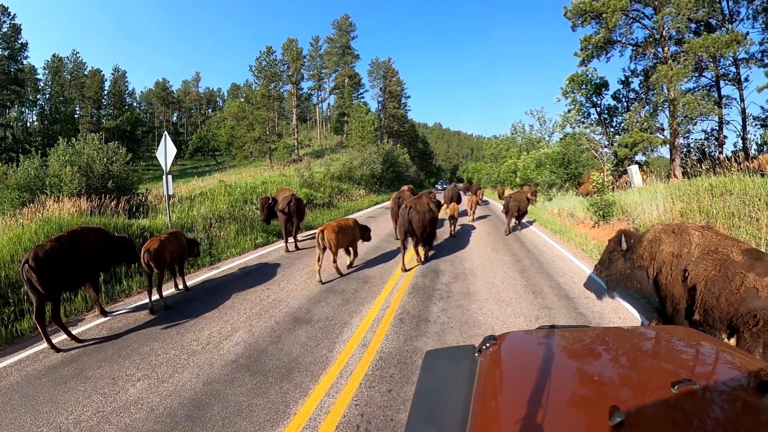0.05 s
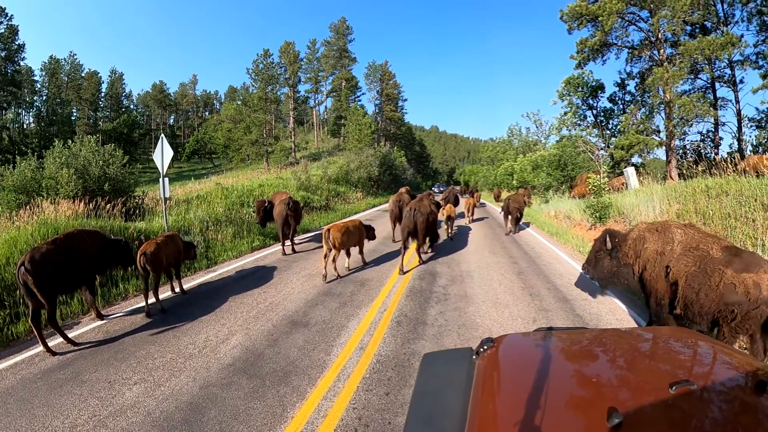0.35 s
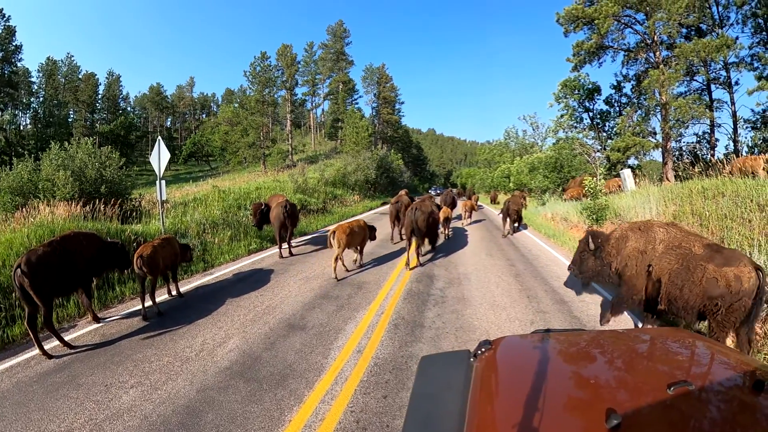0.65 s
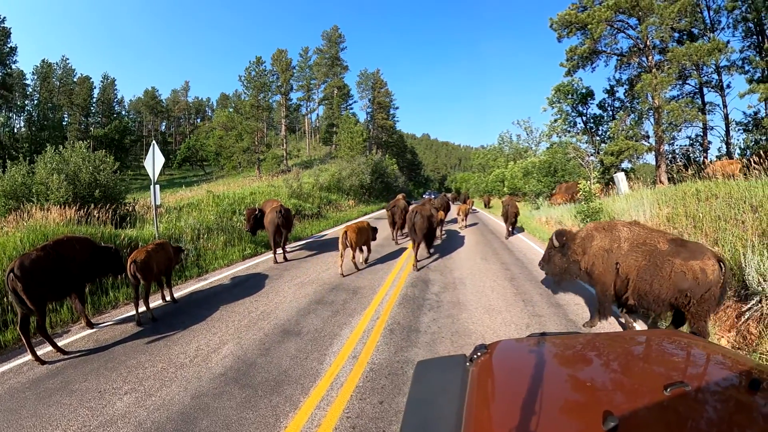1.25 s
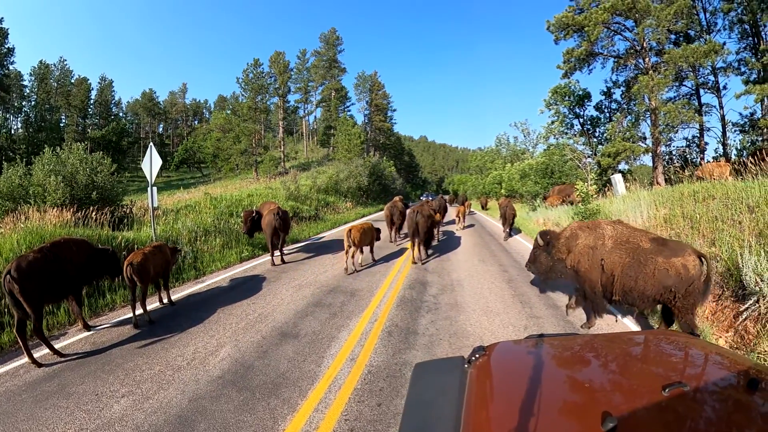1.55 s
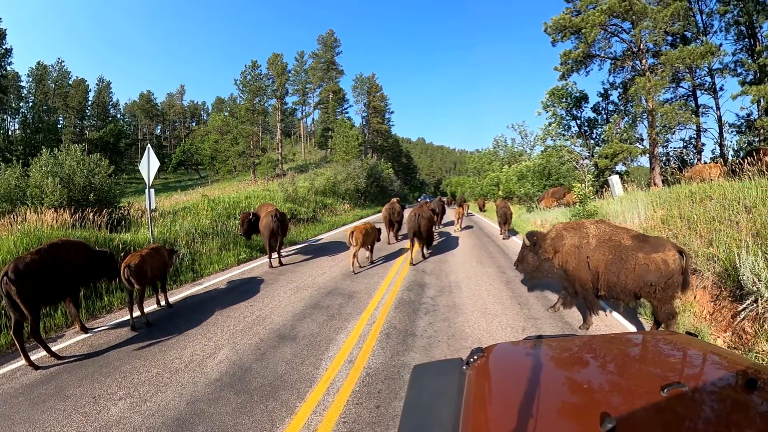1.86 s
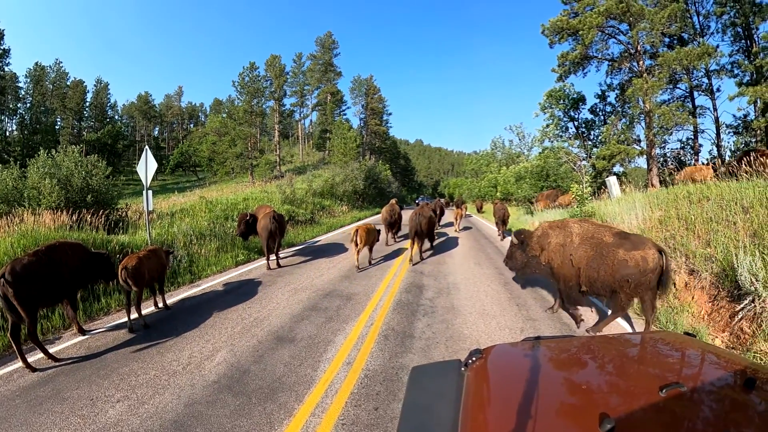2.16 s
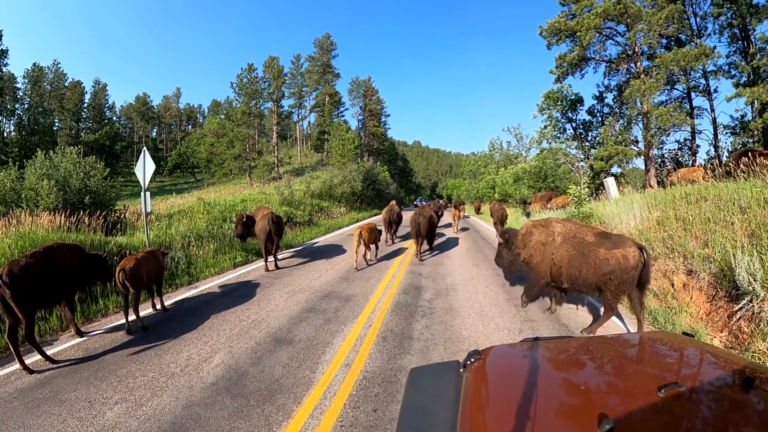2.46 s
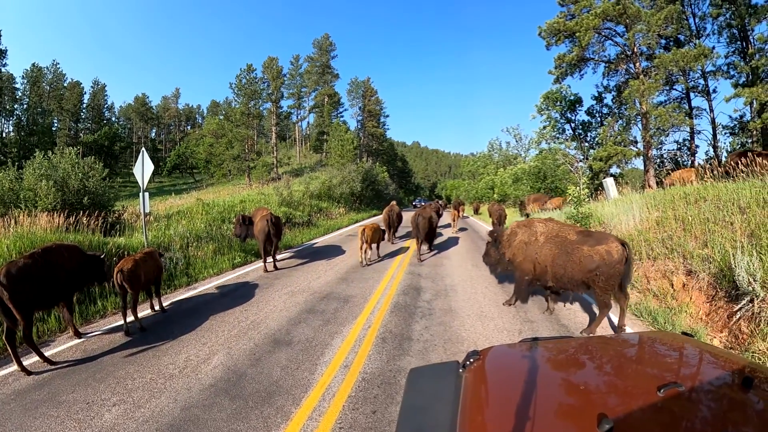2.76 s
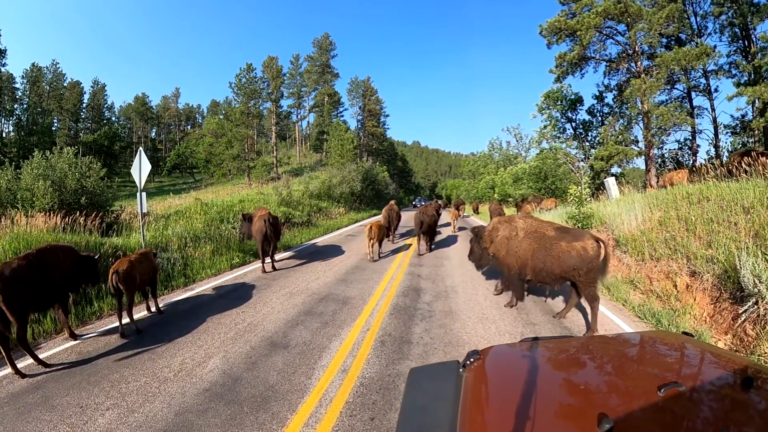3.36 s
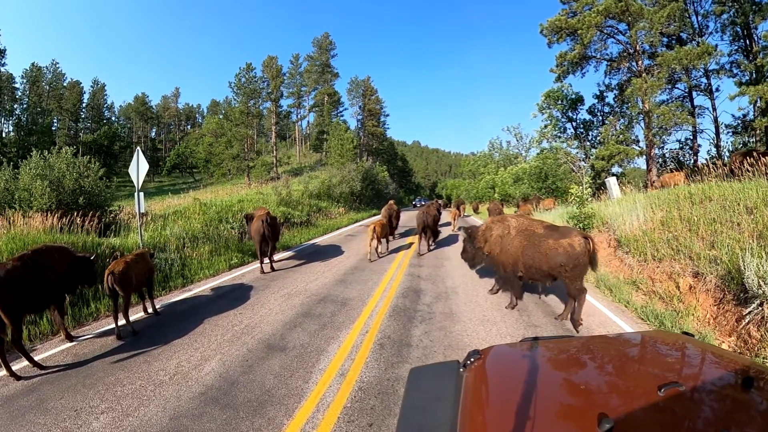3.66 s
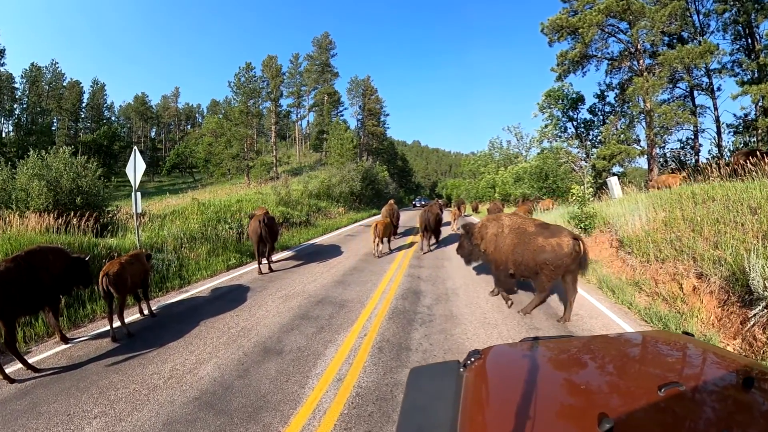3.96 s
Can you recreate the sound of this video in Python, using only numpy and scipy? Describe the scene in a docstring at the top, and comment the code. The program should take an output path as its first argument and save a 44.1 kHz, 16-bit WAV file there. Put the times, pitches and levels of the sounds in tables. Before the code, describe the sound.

Two low, rough bison grunts, short then longer, over a steady engine rumble.

```python
"""Bison on a hill road

Beside the microphone, on a road in open hills, a bison gives a short grunt and then a long one:
slow glottal pulses ring its throat and chest, and in the long grunt its mouth and nose too.
Others answer from up the road. One vehicle idles while a second engine creeps along with the herd.
A hoof scuffs the asphalt, a small bird whistles far off and a light wind bumps the microphone."""
import sys
import numpy as np
from scipy import signal
from scipy.fft import rfft, irfft, next_fast_len
from scipy.io import wavfile
from scipy.ndimage import map_coordinates

SR = 44100
rng = np.random.default_rng(int(sys.argv[2]) if len(sys.argv) > 2 else 0)


def int16_out(signal):
    """Quantize to a 16-bit WAV file."""
    q = np.round(np.clip(np.atleast_2d(signal).T, -1, 1) * 32767)
    wavfile.write(sys.argv[1], SR, q.astype(np.int16))


N = 176400  # 4 seconds

# The course of each close grunt.
# Each row: time in seconds, glottal pulses per second, relative effort in dB, chest gain in dB.
SHORT_GRUNT = [(.0122, 26.6, 0, -7.5), (.125, 27, -2, -2.5), (.165, 23, -14.5, -5), (.19, 25, -20, -12)]
LONG_GRUNT = [(2.0645, 27.6, -14.5, -19), (2.137, 29.06, -2, -14), (2.171, 29.31, -1, -4.5),
              (2.21, 29.86, -14, -2.5), (2.268, 35.84, -13, -0.5), (2.295, 36.92, -1.5, 0.5),
              (2.453, 38.57, 0.5, -0.5), (2.485, 35.62, -4.5, -3.5), (2.541, 33.25, -4.5, -5),
              (2.572, 28.53, -1.5, -7.5), (2.609, 25.64, -18, -15), (2.66, 25.55, -22, -22)]
# Airway resonances. Each row: nominal pitch in Hz, relative level in dB, seconds to fall 60 dB.
SHORT_THROAT_MODES = [(158, -25, .06), (1290, -32, .015), (1473, -27, 0.029), (1831, -24, 0.048),
                      (2173, -38, 0.05), (2660, -47, 0.037), (5560, -51, 0.033), (6240, -44, 0.022)]
LONG_THROAT_MODES = [(1790, -30.5, 0.042), (2773, -44.5, 0.048), (3238, -38, 0.033), (5640, -46, 0.035),
                     (7740, -55.5, 0.042)]
MOUTH_MODES = [(756, -31, 0.044), (1013, -36.5, 0.032), (1244, -40, 0.057), (1547, -35.5, 0.071),
               (1763, -33.5, 0.083)]
NOSE_MODES = [(2132, -32.5, 0.043)]
# How strongly mouth and nose ring in the long grunt. Each row: time in seconds, gain in dB.
MOUTH_GAIN = [(2.268, -16), (2.294, 0), (2.46, -1), (2.49, -10), (2.65, -19)]
NOSE_GAIN = [(2.07, -12), (2.14, 0), (2.22, -15), (2.35, -5), (2.54, -16), (2.57, 5), (2.65, -12)]


def near_bison():
    """Two grunts close by; the long one swells in the chest, opens the mouth and ends in the nose."""
    short = grunt(SHORT_GRUNT, SHORT_THROAT_MODES, gain_db=3)
    cavities = [(MOUTH_MODES, MOUTH_GAIN), (NOSE_MODES, NOSE_GAIN)]
    long = grunt(LONG_GRUNT, LONG_THROAT_MODES, gain_db=4, cavities=cavities)
    return echoed(short + long, db=-11.5, t60=0.19)


# Chest resonances. Each row: nominal pitch in Hz, relative level in dB, seconds to fall 60 dB.
CHEST_MODES = [(126, -28, 0.1), (185.3, -26, 0.067), (231, -27.5, 0.055), (349, -28, 0.057)]
# Rasping breath at close range. Each row: frequency in Hz, relative level in dB.
RASP_SPECTRUM = [(300, 0), (1800, 4.5), (4600, -10.5), (7500, -13), (14000, -39.5)]


def grunt(gesture, throat, gain_db, cavities=()):
    """Slow glottal pulses ring throat, chest and any open cavities, each with a puff of rasping air."""
    pulse_hz, effort_db, chest_db = curves(gesture)
    parts = [(throat, effort_db), (CHEST_MODES, chest_db)]
    parts += [(modes, curves(gain)[0]) for modes, gain in cavities]
    first, last = max(round(gesture[0][0] * SR), 0), round(gesture[-1][0] * SR)
    cycles = np.cumsum(pulse_hz[first:last]) / SR
    pulse_samples = first + np.searchsorted(cycles, np.arange(int(cycles[-1]) + 1))
    t = np.arange(SR // 8) / SR
    puff = decay(t, t60=0.066) * rise(t, seconds=0.0043)
    voice, puffs = np.zeros(N), np.zeros(N)
    for i in pulse_samples:
        tuning = 1 - 0.0022 * chest_db[i]  # resonances sharpen a little as the chest tone falls away
        add(voice, i / SR, sum(amp(db[i]) * airway_ring(modes, t, tuning) for modes, db in parts))
        add(puffs, i / SR, amp(effort_db[i]) * puff)
    rasp = amp(-39) * puffs * noise(RASP_SPECTRUM)
    return amp(gain_db) * (voice + rasp)


# How late a resonance speaks. Each row: frequency in Hz, delay in seconds.
MODE_DELAY = [(1200, 0), (1800, 0.003), (3200, 0.00078)]
# How gently it starts. Each row: frequency in Hz, rise time constant in seconds.
MODE_RISE = [(1200, 0.00076), (1750, 0.0023), (3200, 0.0015)]


def airway_ring(modes, t, tuning):
    """Soft, wet resonances answer one glottal pulse; the upper ones speak later."""
    hz, db, t60 = np.transpose(modes)[:, :, None]
    level_scatter, pitch_scatter = rng.standard_normal((2, len(modes), 1))
    pitch_hz = hz * (tuning + 0.0074 * pitch_scatter)
    age = np.maximum(t - along(MODE_DELAY, hz), 0)
    # The lower resonances start flat and rise as the glottis shuts.
    flat_share, bend_s = 0.19 * (hz < 2200), 0.0023
    bent_age = age - flat_share * bend_s * rise(age, bend_s)
    phase_flutter = 0.07 * np.cumsum(rng.standard_normal(age.shape) * np.sqrt(hz / SR), 1)
    envelope = amp(db + 2 * level_scatter) * decay(age, t60) * rise(age, along(MODE_RISE, hz)) ** 2
    return np.sum(envelope * np.sin(2 * np.pi * pitch_hz * bent_age + phase_flutter), 0)


# Grunts up the road. Each row: start in seconds, length in seconds, level in dB.
FAR_GRUNTS = [(3.27, 0.27, -44), (3.742, 0.33, -31.5)]
# Their tone at that distance. Each row: frequency in Hz, relative level in dB.
FAR_CHEST_SPECTRUM = [(60, -33), (110, 2), (150, 4.5), (190, 2), (260, -23), (1000, -70)]


def far_bison():
    """From farther up the road, only the pulsing chest tone carries to the microphone."""
    pulse_hz = 36.4 * (1 + 0.0249 * wobble(20))
    cycles = np.cumsum(pulse_hz) / SR
    pulses = np.diff(np.floor(cycles), prepend=0)
    return unit_rms(filtered(pulses, FAR_CHEST_SPECTRUM)) * swells(FAR_GRUNTS)


# The hum of the standing vehicle. Each row: multiple of the firing rate, level in dB.
IDLE_HARMONICS = [(1, -27.5), (2, -35)]


def idling_engine(firing_hz=36.76, whine_hz=353.2):
    """The standing vehicle hums with its firing harmonics and a thin accessory whine."""
    hum = sum(amp(db) * unsteady_tone(multiple * firing_hz, waver_db=0.7, drift_radians=0.089)
              for multiple, db in IDLE_HARMONICS)
    return hum + amp(-51.5) * unsteady_tone(whine_hz, waver_db=2, drift_radians=0.21)


# The engine following the herd. Each row: time in seconds, cycles per second, gain in dB.
CREEP_SPEED = [(0, 9.84, 0.5), (.85, 10.17, -3), (1.2, 12.1, -2), (1.55, 12.93, -1.5), (2, 12.2, -0.5),
               (2.5, 11.25, 0.5), (3, 9.54, -0.5), (3.4, 8.9, -1.5), (4, 8.94, 1.5)]
# Its exhaust tones. Each row: multiple of the cycle rate, relative level in dB.
EXHAUST_ORDERS = [(4, -36), (5, -26.5), (6, -37), (7, -36.5), (9, -37), (10, -36), (11, -36), (12, -39.5)]
# What its muffler lets out. Each row: frequency in Hz, gain in dB.
MUFFLER_RESPONSE = [(47, -3), (59, 2), (85, -1.5), (138, 0), (155, -7.5)]


def creeping_engine(scatter_radians=0.45):
    """The exhaust throbs once a cycle, all orders locked to the crank, as it speeds up and settles."""
    cycle_hz, gain_db = curves(CREEP_SPEED)
    cycle_phase = 2 * np.pi * np.cumsum(cycle_hz) / SR
    exhaust = np.zeros(N)
    for order, db in EXHAUST_ORDERS:
        level_db = db + gain_db + along(MUFFLER_RESPONSE, order * cycle_hz) + wobble(10)
        exhaust += amp(level_db) * np.sin(order * cycle_phase + scatter_radians * rng.standard_normal())
    return np.sqrt(2) * exhaust


# Far whistles. Each row: start and length in seconds, first, middle and last pitch in Hz, level in dB.
BIRD_NOTES = [(2.684, .06, 2850, 2560, 2280, -52), (2.76, 0.085, 2950, 2880, 2240, -50),
              (3.256, .1, 2425, 2676, 2730, -45), (3.394, 0.072, 3080, 2770, 2500, -50),
              (3.898, 0.098, 2860, 2490, 2260, -43)]
# More birds, blurred by distance. Each row: frequency in Hz, relative level in dB.
TWITTER_SPECTRUM = [(1700, -70.5), (2550, 2), (2900, -2), (4000, -71)]


def far_birds():
    """Slurred, slightly husky whistles echo among the pines, with a faint twitter near the end."""
    song = np.zeros(N)
    for start, length, first_hz, middle_hz, last_hz, db in BIRD_NOTES:
        progress = np.linspace(0, 1, round(length * SR))
        slur = np.polyfit([0, 0.5, 1], [first_hz, middle_hz, last_hz], 2)
        warble = 1 + 0.018 * wobble(300)[:len(progress)]
        hz = np.polyval(slur, progress) * warble
        add(song, start, amp(db) * np.sin(np.pi * progress) * np.sin(2 * np.pi * np.cumsum(hz) / SR))
    whistles = echoed(song, db=-2.5, t60=0.35)
    twitter = amp(-56) * swell(start=3.44, length=1) * noise(TWITTER_SPECTRUM)
    return whistles + twitter


# A hoof on the road. Each row: start in seconds, length in seconds, level in dB.
SCUFFS = [(1.383, 0.056, -55)]
# The grit under it. Each row: frequency in Hz, relative level in dB.
GRIT_SPECTRUM = [(500, -13), (2000, -10), (7000, -4), (14000, -36)]


def hoof_scuff():
    """A hoof drags over the asphalt in one faint, grainy hiss."""
    grit = unit_rms(noise(GRIT_SPECTRUM) * amp(4 * wobble(370)))
    return grit * swells(SCUFFS)


# The steady rumble and rush at the roadside. Each row: frequency in Hz, relative level in dB.
RUMBLE_SPECTRUM = [(8, -19), (25, 1), (50, 7.5), (130, 0.5), (190, -12.5), (4000, -120)]
RUSH_SPECTRUM = [(100, -3.5), (320, 2), (490, -4), (700, -6.5), (860, -14), (1030, -11.5), (1400, -17),
                 (3200, -24), (4600, -31), (5300, -27), (7700, -35), (9900, -45), (12000, -58)]


def roadside_air():
    """A low rumble and the rush of fans, tyres and trees lie all around the microphone."""
    rumble = amp(-29 + 1.7 * wobble(4.2)) * noise(RUMBLE_SPECTRUM)
    rush = amp(-38.5 + 0.42 * wobble(14)) * noise(RUSH_SPECTRUM)
    return rumble + rush


def wind_bump(centre_s=3.38, width_s=0.034, hz=27.02):
    """Light wind knocks once on the microphone, a brief, very low thump."""
    t = np.arange(N) / SR - centre_s
    return amp(-16) * np.exp(-(t / width_s) ** 2) * np.sin(2 * np.pi * hz * t)


def amp(db):
    return 10 ** (np.asarray(db) / 20)


def unit_rms(x):
    return x / np.sqrt(np.mean(x ** 2) + 1e-20)


def rise(t, seconds):
    return 1 - np.exp(-t / seconds)


def decay(t, t60):
    return np.exp(-np.log(1000) * t / t60)


def along(points, hz):
    """Interpolate (Hz, value) points on a log frequency axis."""
    frequencies, values = np.transpose(points)
    return np.interp(np.log(hz + 1), np.log(frequencies + 1), values)


def curves(rows):
    """One value per sample for each column after the time."""
    times, *columns = np.transpose(rows)
    return [np.interp(np.arange(N) / SR, times, column) for column in columns]


def wobble(rate):
    """A smooth random curve, rate knots a second."""
    return map_coordinates(rng.standard_normal(int(N * rate / SR) + 4), [np.arange(N) * rate / SR])


def unsteady_tone(hz, waver_db, drift_radians):
    """A sine of rms near 1 whose level and phase wander."""
    phase = 2 * np.pi * (np.cumsum(np.full(N, hz)) / SR + rng.random()) + drift_radians * wobble(4.98)
    return np.sqrt(2) * amp(waver_db * wobble(6)) * np.sin(phase)


def filtered(x, spectrum):
    """x shaped by (Hz, dB) points."""
    size = next_fast_len(N + SR // 2)
    gain = amp(along(spectrum, np.fft.rfftfreq(size, 1 / SR)))
    return irfft(rfft(x, size) * gain, size)[:N]


def noise(spectrum):
    """Coloured noise of rms 1."""
    return unit_rms(filtered(rng.standard_normal(N), spectrum))


def swell(start, length):
    """A rounded rise and fall, timed in seconds."""
    return np.sin(np.pi * np.clip((np.arange(N) / SR - start) / length, 0, 1))


def swells(rows):
    return sum(amp(db) * swell(start, length) for start, length, db in rows)


def add(track, start_s, sound):
    """Mix a sound into the track."""
    i = max(round(start_s * SR), 0)
    track[i:i + len(sound)] += sound[:max(N - i, 0)]


def echoed(x, db, t60):
    """x with a diffuse outdoor tail."""
    t = np.arange(SR // 2) / SR
    tail = rng.standard_normal(len(t)) * decay(t, t60)
    return x + amp(db) * signal.fftconvolve(x, tail / np.linalg.norm(tail))[:N]


def scene():
    """Everything as it reaches one microphone at the roadside."""
    herd = near_bison() + far_bison()
    engines = idling_engine() + creeping_engine()
    return (herd + engines + roadside_air() + wind_bump() + far_birds() + hoof_scuff())[None]


def record(dry):
    """The microphone's treble falls away steeply above 11.5 kHz; both ends fade over 2 ms."""
    lowpass = signal.butter(12, 11500, fs=SR, output="sos")
    samples_from_edge = np.minimum(np.arange(N), np.arange(N)[::-1])
    return signal.sosfilt(lowpass, dry) * np.minimum(samples_from_edge / (0.002 * SR), 1)


dry = scene()
out = record(dry)
int16_out(out)
```